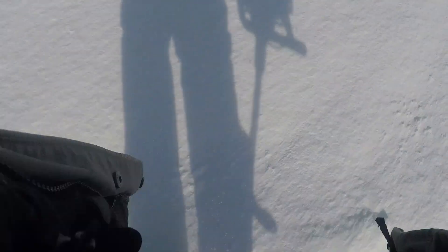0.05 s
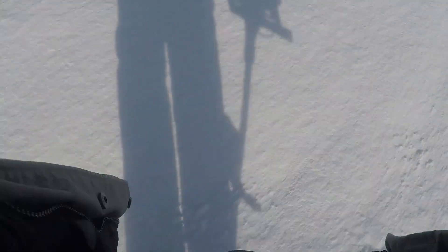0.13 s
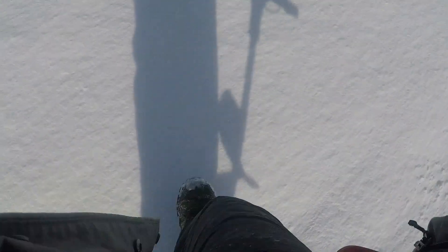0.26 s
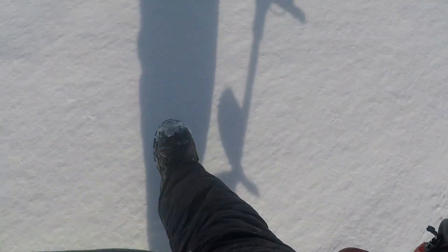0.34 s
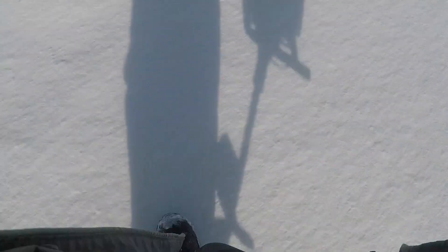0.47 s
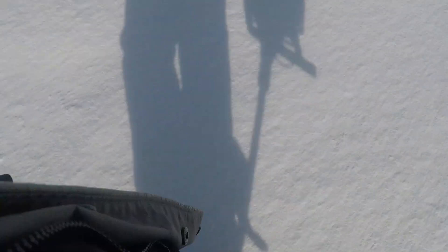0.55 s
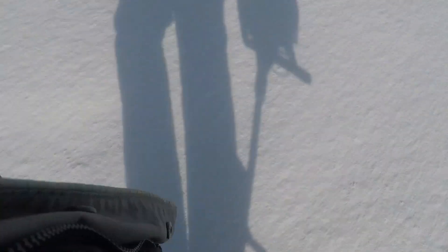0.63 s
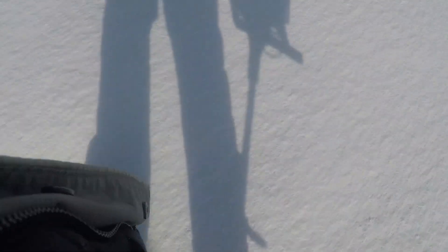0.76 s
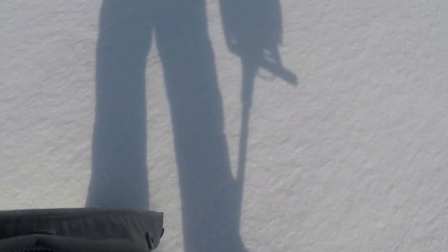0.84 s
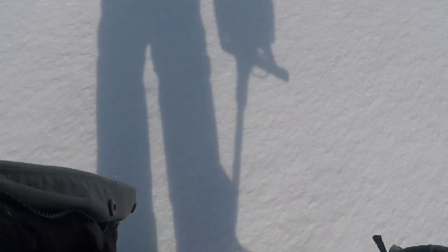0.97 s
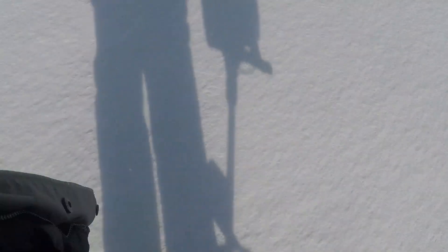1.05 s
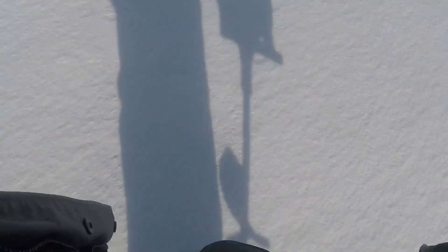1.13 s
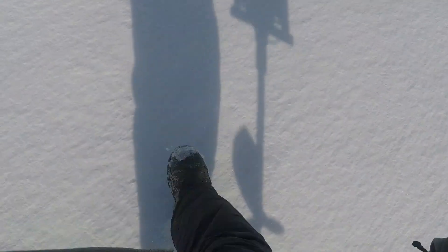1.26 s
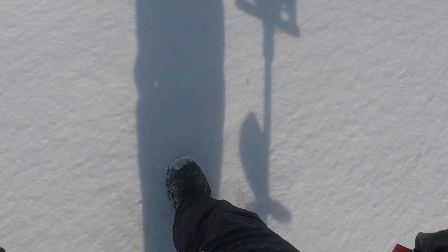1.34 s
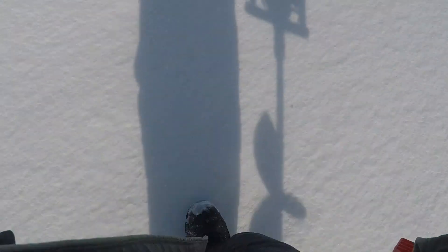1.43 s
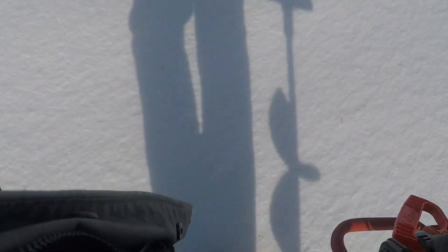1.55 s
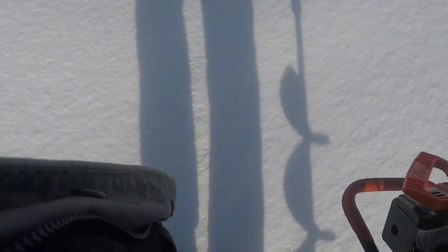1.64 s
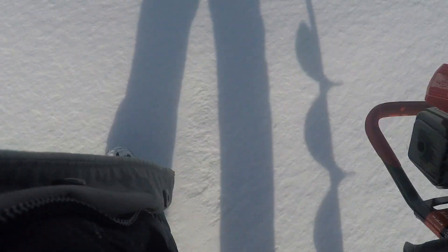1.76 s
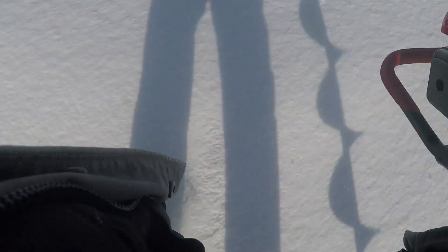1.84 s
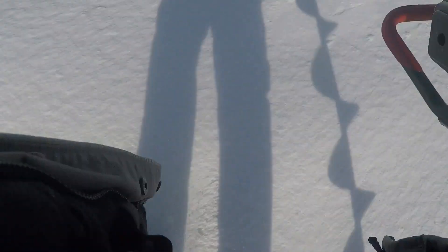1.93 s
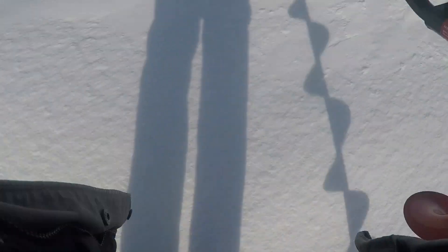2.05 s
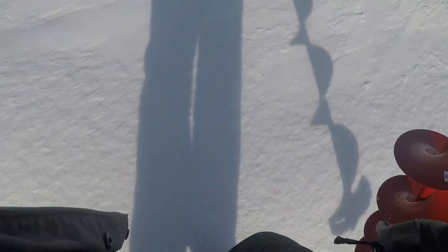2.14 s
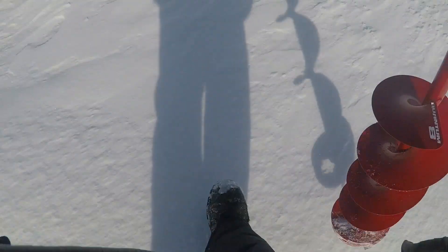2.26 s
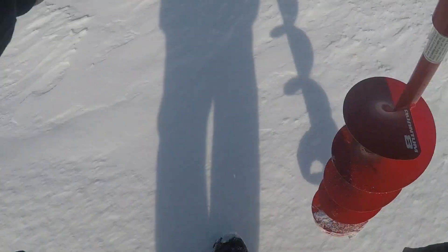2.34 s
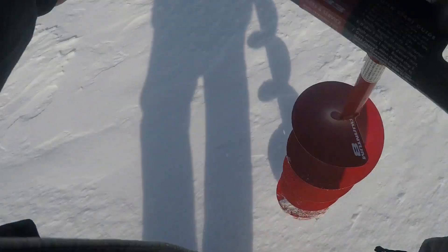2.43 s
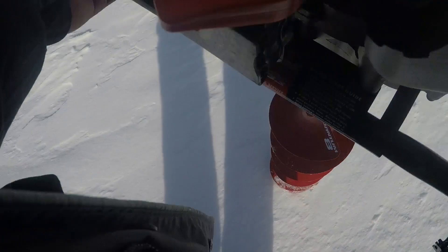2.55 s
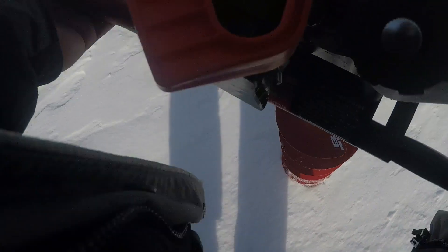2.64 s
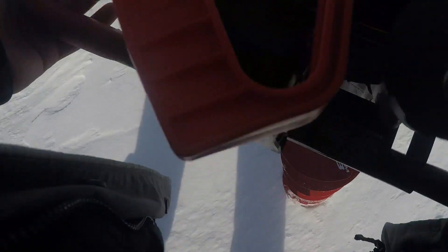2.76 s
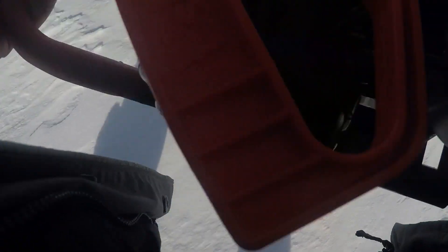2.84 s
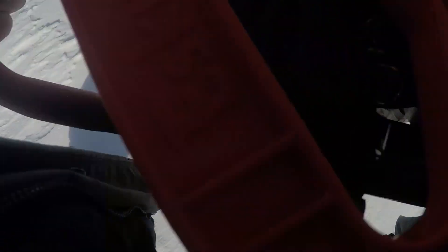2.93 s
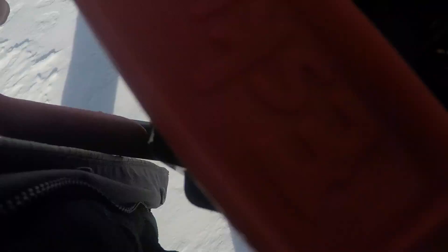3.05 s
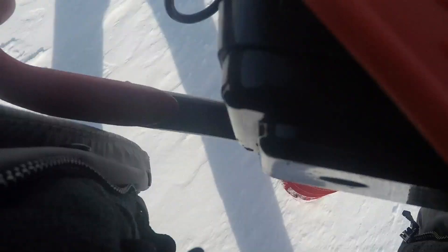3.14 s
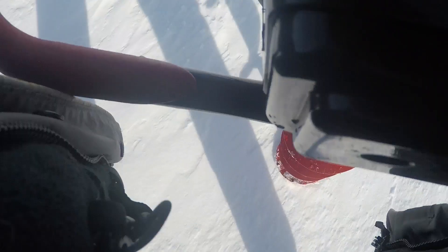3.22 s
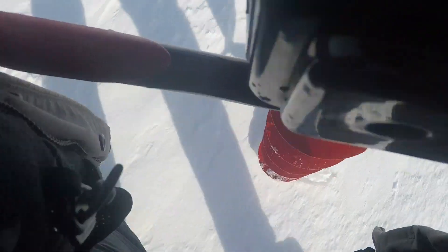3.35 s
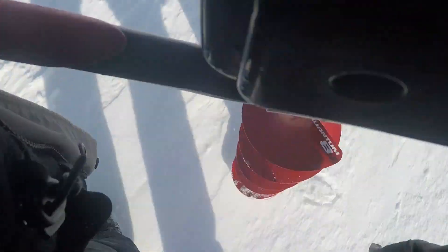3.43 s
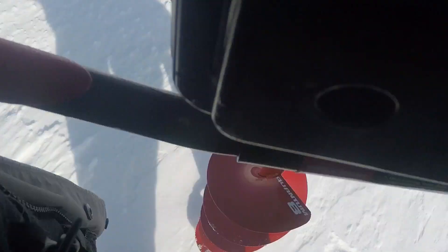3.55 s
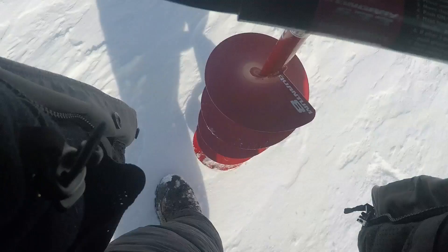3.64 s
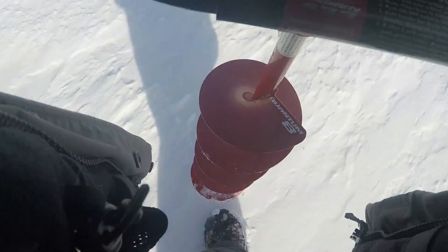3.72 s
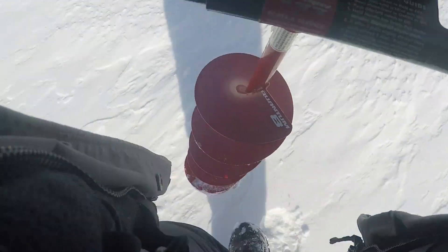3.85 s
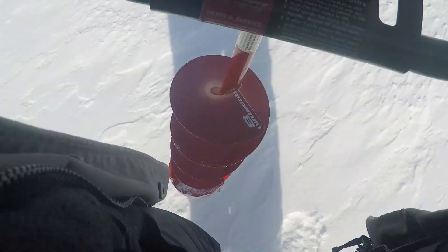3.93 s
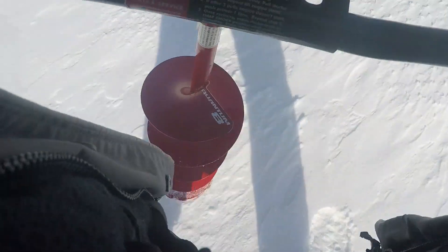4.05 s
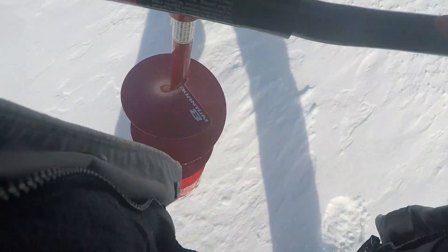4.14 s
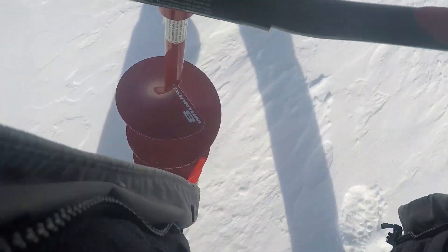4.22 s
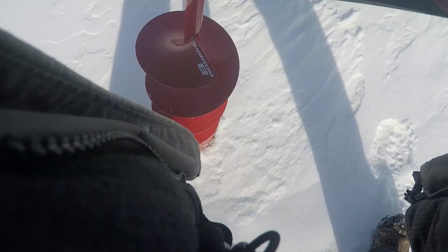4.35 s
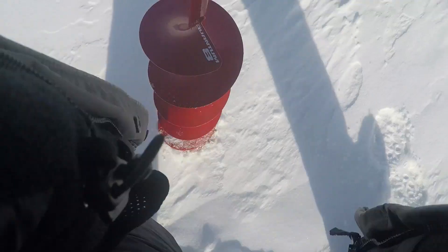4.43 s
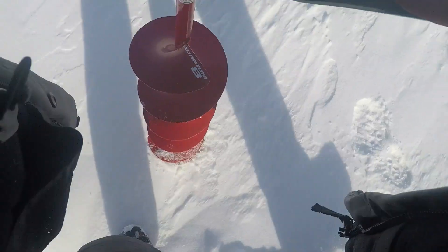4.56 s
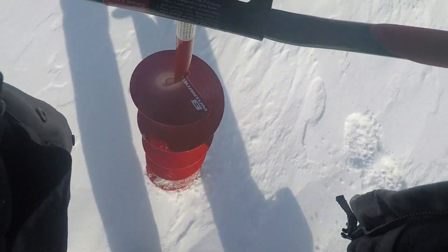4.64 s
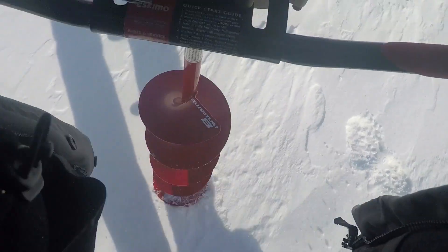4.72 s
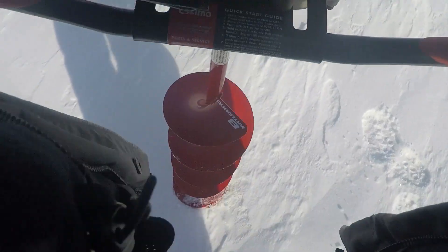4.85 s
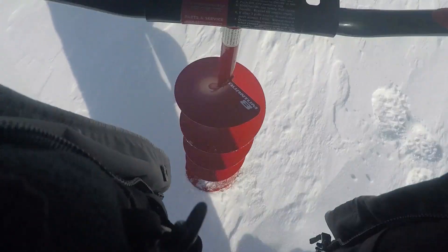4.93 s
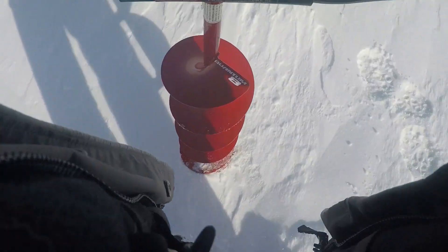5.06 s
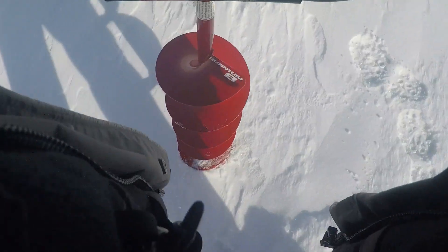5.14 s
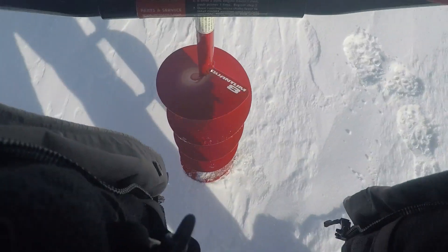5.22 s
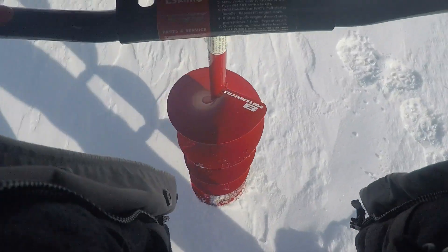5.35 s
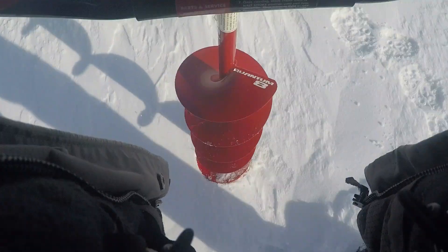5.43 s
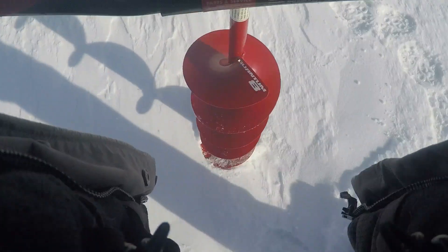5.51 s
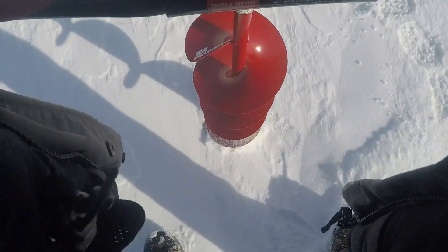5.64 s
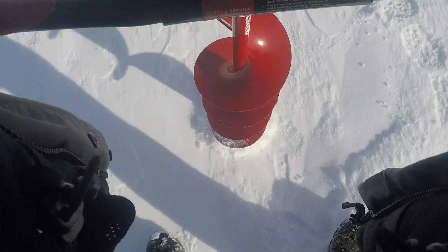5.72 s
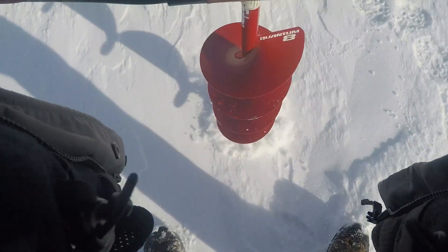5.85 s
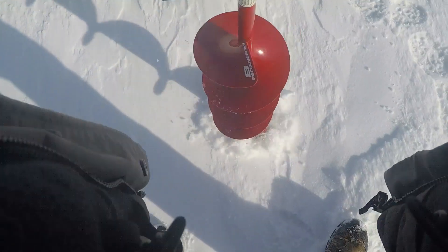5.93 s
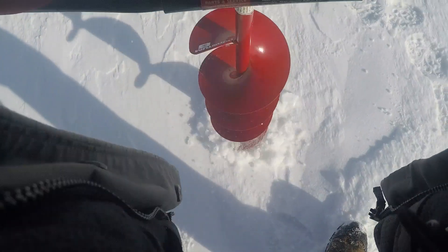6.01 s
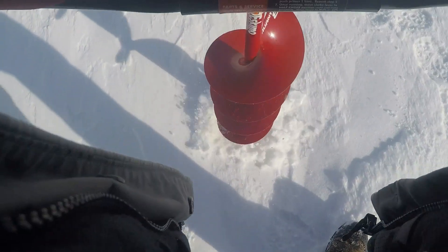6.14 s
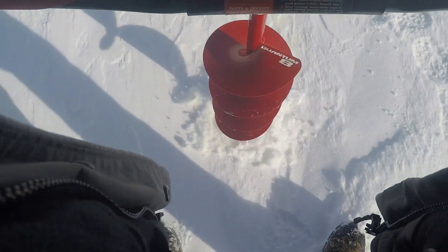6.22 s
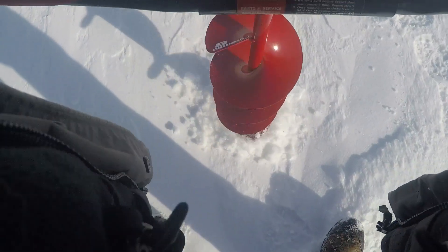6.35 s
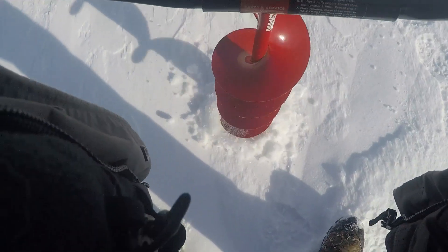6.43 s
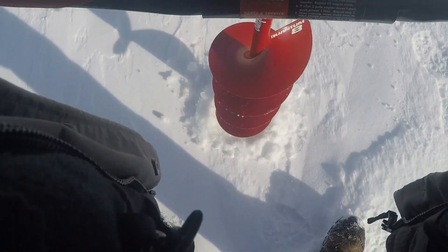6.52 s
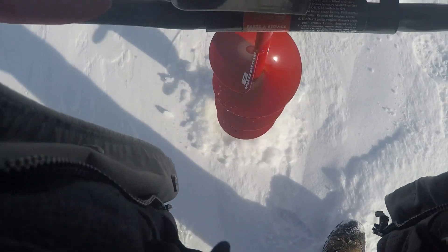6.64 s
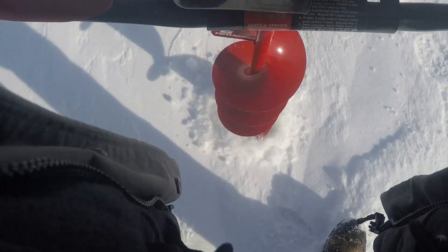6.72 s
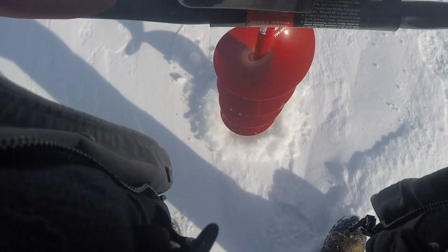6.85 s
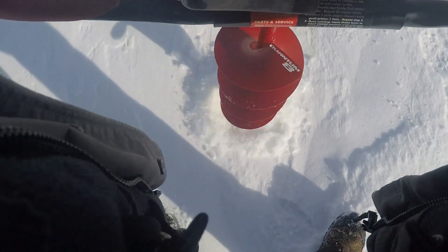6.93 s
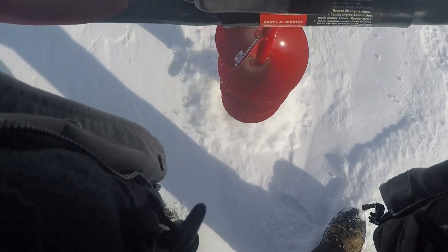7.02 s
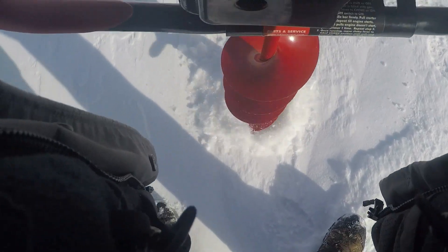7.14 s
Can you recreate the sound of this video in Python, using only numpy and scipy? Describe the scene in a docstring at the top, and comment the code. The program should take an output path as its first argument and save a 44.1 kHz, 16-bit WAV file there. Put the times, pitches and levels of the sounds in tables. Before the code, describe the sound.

A two-stroke ice auger idles outdoors, popping and clattering, while boots crunch softly on snow and wind rumbles on a body-worn microphone. The engine grows louder and more metallic as it swings close. Its housing knocks hard against the microphone and buzzes briefly, making the level dip and creep back. Near the end the throttle opens and the engine races with a gear whine, laboring slightly under load.

```python
"""Ice auger in the snow

A two-stroke ice auger idles, popping and clattering, as it is carried over crunching snow and swung
round in front of a body-worn camera. Its housing bumps the camera and buzzes against it; the gain
control ducks and creeps back. Then the throttle opens: the engine races, the gears whine and the bit
bites. Wind buffets the microphone."""
import sys
import numpy as np
from scipy import signal
from scipy.fft import rfft, irfft
from scipy.io import wavfile
from scipy.ndimage import uniform_filter1d

SR = 44100
rng = np.random.default_rng(int(sys.argv[2]) if len(sys.argv) > 2 else 0)


def materialize(psi):
    """Save the field psi as 16-bit PCM at rate SR to the path in sys.argv[1].

    A 1-D psi becomes a single channel; in a 2-D psi each row is a channel.
    """
    bounded = np.clip(np.atleast_2d(psi).T, -1, 1)
    quanta = np.round(bounded * 32767).astype(np.int16)
    wavfile.write(sys.argv[1], SR, quanta)


N = 316638
T = np.arange(N) / SR
BITE_S = 6.07  # the bit bites and the engine starts to limp


def amp(db):
    """Decibels to amplitude."""
    return 10 ** (np.asarray(db) / 20)


def unit(x):
    """Scale to an overall RMS of 1."""
    return x / np.sqrt(np.mean(x ** 2) + 1e-20)


def curve(rows):
    """Draw straight lines in time through (time, value) points."""
    return np.interp(T, *np.transpose(rows))


def steady(x):
    """Hold the running RMS at 1, leaving single beats intact."""
    return x / np.sqrt(uniform_filter1d(uniform_filter1d(x ** 2, size=4800), size=4800) + 1e-12)


def noise():
    """White noise."""
    return rng.standard_normal(N)


def waver(hz):
    """Random drift of RMS 1, mostly slower than hz."""
    return unit(irfft(rfft(noise()) / (1 + (np.fft.rfftfreq(N, 1 / SR) / hz) ** 4), N))


def colour(x, points):
    """Minimum-phase EQ through (Hz, dB) points, falling 40 dB an octave outside them."""
    hz, db = np.transpose(points)
    octave = np.log2(abs(np.fft.fftfreq(8192, 1 / SR)) + 1)
    outside = abs(octave - np.clip(octave, np.log2(hz[0]), np.log2(hz[-1])))
    gain_db = np.maximum(np.interp(octave, np.log2(hz), db) - 40 * outside, -100)
    response = np.exp(np.conj(signal.hilbert(np.log(amp(gain_db)))))
    return signal.oaconvolve(x, np.fft.ifft(response).real[:4096])[:N]


def blend(a, b, share):
    """Level two sounds and crossfade from a to b at equal power."""
    share = np.clip(share, 0, 1)
    return np.sqrt(1 - share) * steady(a) + np.sqrt(share) * steady(b)


def strokes(turns, angle, jitter, spread_db):
    """One click a turn, uneven in time and strength; angle and jitter are in turns."""
    count = np.arange(1, int(turns[-1]) + 1)
    late, size = np.clip(rng.standard_normal((len(count), 2)).T, -1.7, 1.7)
    at = np.clip(np.interp(count + angle + jitter * late, turns, np.arange(N)), 0, N - 2)
    whole, out = at.astype(int), np.zeros(N)
    out[whole] = amp(spread_db * size) * (1 - at % 1)
    out[whole + 1] += amp(spread_db * size) * (at % 1)
    return out


def fade(clicks, decay_s):
    """An envelope that jumps at each click and dies away."""
    return signal.lfilter([1], [1, -np.exp(-1 / (decay_s * SR))], clicks)


def swells(rows):
    """A bell-shaped swell for each (time [s], level [dB], half-width [s])."""
    return sum(amp(db) * np.exp(-((T - s) / width) ** 2) for s, db, width in rows)


def mode(hz, width_hz, samples):
    """The dying ring of one struck resonance."""
    t = T[:samples]
    return np.exp(-np.pi * width_hz * t) * np.cos(2 * np.pi * hz * t)


def wind():
    """Low buffeting on the microphone, dropping once the engine roars."""
    # rumble of the wind: (frequency [Hz], relative level [dB])
    rumble_eq = [(8, -2), (18, 17.5), (35, 4), (60, -5), (100, -15), (200, -14), (500, -27), (1200, -86)]
    walking_db, gust_db, revving_db = -31, 0.2, -7
    revving = np.clip((T - 5.54) / 0.22, 0, 1)
    level_db = walking_db + gust_db * waver(hz=2.4) + revving_db * revving
    return amp(level_db) * steady(colour(noise(), rumble_eq))


def jolts():
    """Steps and sways jolt the camera with soft, deep thuds."""
    # thuds: (time [s], level [dB], half-width [s])
    thuds = [(.14, -24.5, 0.032), (.49, -23, 0.084), (.85, -26.5, 0.033), (1.22, -19.5, 0.017),
             (1.59, -22.5, 0.034), (1.92, -23, 0.095), (2.63, -24, 0.042), (3.0, -35, 0.031),
             (3.17, -24, 0.018), (4.5, -20.5, 0.028), (5.81, -28, .04), (6.14, -28, .025)]
    # their tone: (frequency [Hz], relative level [dB])
    thud_eq = [(20, 4.5), (40, 2), (65, -6.5), (110, -16.5), (220, -36), (600, -70)]
    return swells(thuds) * steady(colour(noise(), thud_eq))


def snow():
    """Boots on snow and rubbing clothes crunch in clumps of tiny snaps."""
    # crunches: (time [s], level [dB], half-width [s])
    crunches = [(0.108, -45, .035), (0.252, -44, .03), (0.458, -46, .018), (.54, -48, 0.065),
                (0.828, -45.5, 0.11), (1.0, -49, .03), (1.414, -45, 0.059), (1.635, -50, .025),
                (2.548, -38, 0.051), (4.41, -28.5, .03)]
    snap_eq = [(400, 15.5), (1000, 6.5), (1400, 9.5), (3000, 7), (4800, 2), (7500, -14.5), (15000, -23)]
    snaps = noise() * (rng.random(N) < 5000 / SR)
    return swells(crunches) * unit(colour(snaps, snap_eq))


def knocks():
    """Each blow cracks on the shell, duller when soft, and rocks the camera on its mount."""
    # blows: (time [s], crack gain [dB], crack decay [s], crack cutoff [Hz],
    #         thump level [dB], thump pitch [Hz], thump decay [s])
    blows = [(2.02, -22.5, 0.0038, 2200, -42, 120, .0092), (2.675, -22, .012, 2400, -41, 100, .01),
             (3.4371, 16, 0.0087, 14000, -3, 120, .004), (3.439, 25, 0.003, 13000, 26.5, 96, 0.0041),
             (3.451, 26.5, 0.0019, 14000, 29, 108, 0.004), (3.642, 7.5, 0.0034, 2000, 26.5, 43.2, 0.01),
             (3.677, 15.5, 0.0021, 4200, 14.5, 142, 0.0096), (4.384, -13, 0.01, 12000, -37, 129, 0.0088)]
    # tone of the crack: (frequency [Hz], relative level [dB])
    crack_eq = [(150, 20), (700, -17.5), (1300, 3.5), (2000, 8), (3000, 4.5), (4500, -12), (8000, -16.5),
                (15000, -71)]
    crack, out = unit(colour(noise(), crack_eq)), np.zeros(N)
    for s, crack_db, crack_decay, cutoff_hz, thump_db, thump_hz, thump_decay in blows:
        t = np.maximum(T - s, 0)
        envelope = amp(crack_db) * np.exp(-np.minimum(t / crack_decay, 20)) * (t > 0)
        out += signal.lfilter(*signal.butter(2, cutoff_hz, fs=SR), envelope * crack)
        out += amp(thump_db) * np.sin(2 * np.pi * thump_hz * t) * np.exp(-t / thump_decay)
    return out


def housing_buzz(turns):
    """The shaking housing touches the camera and chatters on its shell once a turn."""
    # housing pressed on the camera: (time [s], gain [dB])
    contact = [(3.445, -60), (3.46, 5.5), (3.55, 0.5), (3.63, 3), (3.645, 6.5), (3.66, -55)]
    # shaking passed on: (crank order, relative level [dB])
    orders = [(1, 1), (2, 1), (3, -17), (4, -6.5), (5, -19)]
    # camera shell: (frequency [Hz], relative level [dB])
    shell_eq = [(200, 10), (500, -11), (850, -19), (1050, -12), (1330, 7.5), (1750, -2), (2050, -5),
                (2480, 4), (2880, -12), (3180, 3), (3900, -23), (4600, -7), (5700, -29), (14000, -54)]
    shake = sum(amp(db) * np.cos(2 * np.pi * (order * turns + rng.random())) for order, db in orders)
    pressure = .27 + np.cos(np.pi * (turns - .6)) ** 10
    chatter = unit(colour(noise() * pressure, shell_eq))
    touching = (T > contact[0][0]) * (T < contact[-1][0])
    return amp(curve(contact)) * (shake + amp(-5.5) * chatter) * touching


def clutch():
    """The clutch shoes scrape as they take hold, then the intake whistles briefly near 8 kHz."""
    scrape = unit(colour(noise(), [(2000, 4), (7000, 0), (15000, -17)]))
    squeal = unit(colour(noise(), [(7500, -28), (8000, 6), (8500, -14)]))
    return swells([(5.49, -22, 0.015)]) * scrape + swells([(5.56, -36, 0.051)]) * squeal


def steel(turns, near, level_db):
    """Blade and handle ring, shaken once a turn; each mode swells and sinks by itself."""
    # steel modes: (frequency [Hz], width [Hz], relative level at the hip [dB], change when near [dB])
    modes = [(2450, 23, 8, -2), (3005, 8.4, -2.5, 4), (4430, 23, -4.5, -7), (4950, 38, -5.5, 2),
             (5420, 41, -2, -1), (6090, 43, -12, 11), (6600, 84, -22, -5), (6500, 35, -13, 0)]
    flicker_db = 1.7
    kicks = strokes(turns, angle=.6, jitter=.02, spread_db=2)
    shaking = steady(noise() * (.2 + fade(kicks, decay_s=.003)))
    rings = np.zeros(N)
    for hz, width, db, near_db in modes:
        gain = amp(db + near_db * near + flicker_db * waver(hz=0.67))
        rings += gain * signal.oaconvolve(shaking, mode(hz, width, 4096))[:N]
    return amp(level_db) * unit(rings)


def gears(hz, turns):
    """Meshing teeth and fan blades sing on whole crank orders, loudest where the gearbox resonates."""
    # partials of the whine: (crank order, relative level [dB])
    partials = [(13, -15), (14, -15.5), (15, -17), (16, -7.5), (18, -2), (19, -14.5), (20, 1.5), (21, -12),
                (22, 2.5), (23, -3), (28, -16), (29, -13)]
    # gearbox resonances: (frequency [Hz], gain [dB])
    gearbox = [(1700, -18), (2000, -18.5), (2250, -31), (2410, -24), (2490, -16), (2600, -17),
               (2690, -21.5), (2790, -23), (3000, -32), (3900, -40)]
    angle = 2 * np.pi * (turns + 0.0014 * waver(hz=45))
    whine = np.zeros(N)
    for order, db in partials:
        resonance_db = np.interp(order * hz, *np.transpose(gearbox))
        gain = amp(db + resonance_db + 0.52 * waver(hz=22))
        whine += gain * np.cos(order * angle + 2 * np.pi * rng.random())
    return np.sqrt(2) * whine


def fan_hiss(beat, throttle, close):
    """Fan air hisses, pulsing with the beat of the clatter."""
    # air from behind the body: (frequency [Hz], relative level [dB])
    behind_eq = [(2530, -22), (4300, 10.5), (4730, 1.5), (4910, 2), (5580, 6), (5790, -15), (6970, -28),
                 (7310, -10), (8130, -9), (8530, -31), (11400, -15), (13300, -30), (15300, -55)]
    # air close up: (frequency [Hz], relative level [dB])
    close_eq = [(2530, -4), (4300, 2), (4530, 0), (4940, 0), (6720, 3.5), (7310, -1), (7630, -9),
                (8180, -5.5), (9440, -13.5), (10800, -14), (11900, -10), (14700, -27.5), (15300, -25)]
    air = noise() * (beat + 1.4 + 0.16 * throttle + 1.5 * (1 - close))
    return blend(colour(air, behind_eq), colour(air, close_eq), close)


def clatter(turns, throttle, close, level_db, hiss_db):
    """The piston slaps and the clutch rattles each turn, ringing casing and fins; the fan hisses along."""
    # casing from behind the body: (frequency [Hz], relative level [dB])
    behind_eq = [(590, -21), (1000, -15), (1140, -26), (1320, -15.5), (1960, -18), (2480, 0.5),
                 (2740, -20.5), (3080, -8), (3520, -30), (3850, -8), (4600, -45), (5980, -25),
                 (10100, -120)]
    # casing close up: (frequency [Hz], relative level [dB])
    close_eq = [(620, -27), (1050, -25.5), (1280, -25), (1480, -15), (1600, -20.5), (1730, -9.5),
                (1900, -12), (2050, -1.5), (2360, -11), (2860, 2), (3440, -12.5), (3920, -2), (4600, -34.5),
                (5980, -101), (10100, -120)]
    # casing at full throttle: (frequency [Hz], relative level [dB])
    racing_eq = [(650, -26.5), (1100, -20.5), (1270, -24.5), (1370, -12.5), (1540, -14.5), (1740, -4.5),
                 (2240, -6.5), (2480, 0.5), (3040, -3.5), (3310, -10.5), (3910, -2.5), (4600, -49),
                 (5980, -21), (10100, -120)]
    # modes of the cooling fins and covers: (frequency [Hz], width [Hz], relative level [dB])
    fins = [(1710, 16, 3), (2270, 90, -20), (2500, 31, 10.5), (2680, 115, 27.5), (2928, 56, 26),
            (3640, 160, -61), (3940, 130, -11), (5550, 58, 10), (6550, 250, -52)]
    slap = strokes(turns, angle=.52, jitter=.008, spread_db=2.2)
    rattle = strokes(turns, angle=.7, jitter=.018, spread_db=2)
    rebound = strokes(turns, angle=.1, jitter=.03, spread_db=2)
    contrast = 1 - 0.16 * throttle  # at speed the blows grow alike
    blows = 1.2 * slap ** contrast + rattle ** contrast + (0.44 + 2 * throttle) * rebound ** contrast
    beat = steady(fade(blows, decay_s=.0036))
    grit = noise() * (beat + .2 + .9 * throttle + .9 * (1 - close))
    idling = blend(colour(grit, behind_eq), colour(grit, close_eq), close)
    casing = blend(idling, colour(grit, racing_eq), throttle)
    ring = sum(amp(db) * mode(hz, width, 2048) for hz, width, db in fins)
    ringing = colour(signal.oaconvolve(blows, ring)[:N], [(1750, 0.0067), (6800, 0)])
    metal = blend(casing, ringing, .36 - .14 * throttle)
    return amp(level_db) * metal + amp(hiss_db) * fan_hiss(beat, throttle, close)


def gas_puffs(firings, throttle):
    """Gas rushes under the pops and splutters while the throttle snaps open."""
    idle_db, open_db, splutter_db = -9, -14.5, 18
    gas_eq = [(120, -4), (240, 1.5), (330, -3), (550, -3.5), (900, -17), (1500, -28)]
    gas = steady(colour(noise() * (.5 + fade(firings, decay_s=0.13)), gas_eq))
    return amp(idle_db + open_db * throttle + splutter_db * np.sin(np.pi * throttle)) * gas


def exhaust(hz, turns, throttle, level_db):
    """One pop a turn through the muffler, barking as it revs; at top speed every other firing weakens."""
    # muffler at idle: (frequency [Hz], relative level [dB])
    idle_eq = [(30, -70), (55, 3.5), (110, -3), (170, -1), (225, 3.5), (275, 7), (335, -4), (385, -8),
               (445, 0.5), (500, -7.5), (620, -9.5), (800, -13.5), (900, -26.5), (1100, -14.5), (1400, -36),
               (2000, -24)]
    # muffler pulling up to speed: (frequency [Hz], relative level [dB])
    pulling_eq = [(40, -11), (85, 8.5), (125, 12), (200, -3.5), (260, 5.5), (350, -2.5), (450, -5),
                  (600, -7), (680, -9), (760, -1), (930, -17.5), (1010, -8), (1250, -25), (1450, -6),
                  (2000, -23)]
    # muffler flat out: (frequency [Hz], relative level [dB])
    open_eq = [(40, 4), (85, -8), (125, 19.5), (200, -1.5), (272, 9.5), (350, -4), (430, -6.5), (550, -14),
               (690, 5), (830, -6.5), (1000, -7), (1100, -20), (2000, -32)]
    limp_depth, limp_db = 0.4, -2.5
    resonance_hz, width_hz, resonance_db = 118.5, 11.8, 5
    idle = strokes(turns, angle=-.03, jitter=.003, spread_db=1.4)
    racing = strokes(turns, angle=-.03, jitter=.004, spread_db=.5)
    limping = np.clip((T - BITE_S) / 0.033, 0, 1)
    limp = limp_depth * limping * np.cos(np.pi * turns)
    # the limp is felt in the low notes
    racing = racing + colour(racing * limp, [(40, 5.5), (350, 10), (480, 10.5), (600, 1.0), (2000, -8)])
    up_to_speed = np.clip((hz - 123) / 14, 0, 1)
    roar = blend(colour(racing, pulling_eq), colour(racing, open_eq), up_to_speed)
    pops = blend(colour(idle, idle_eq), roar, throttle)
    # the muffler booms as the firing rate sweeps through its resonance
    boom_db = resonance_db * np.exp(-((hz - resonance_hz) / width_hz) ** 2)
    return amp(level_db + boom_db + limp_db * limping) * (pops + gas_puffs(idle, throttle))


def crank():
    """Speed and turns of the crankshaft, and the throttle opening 0-1 that goes with them."""
    # idling: (time [s], speed [turns/s])
    idle_speed = [(0.0, 57.4), (0.59, 56.0), (1.55, 57.4), (2.01, 55.1), (4.15, 56.3), (4.47, 54.4),
                  (5.3, 54.6)]
    # revving up: (time [s], speed [turns/s])
    rev_speed = [(5.37, 54.6), (5.41, 59.9), (5.464, 77.4), (5.516, 87.2), (5.576, 90.4), (5.702, 112.2),
                 (5.802, 123.2), (5.994, 136.3), (6.196, 139.9), (6.392, 136.3), (6.538, 138.0),
                 (6.786, 133.8), (6.942, 135.1), (7.18, 132.4)]
    hz = curve(list(idle_speed) + list(rev_speed))
    throttle = np.clip((hz - 57) / 32, 0, 1)
    wander_turns = 0.0235 * (1 - throttle) * waver(hz=4.9)
    turns = np.maximum.accumulate(np.cumsum(hz) / SR + wander_turns)
    return hz, turns, throttle


def engine(hz, turns, throttle):
    """The two-stroke's voices, louder when near, with the throttle open and under load."""
    # the swing from the hip to the front of the camera: (time [s], nearness [0-1])
    swing = [(0, 0.07), (1.25, 0), (1.93, 0.3), (2.1, 0.48), (2.33, 0.67), (2.5, 0.85), (3.1, 0.92),
             (4.1, .99), (5.3, 0.84)]
    # faders of the voices: (idling at the hip [dB], added when near [dB], added at full throttle [dB])
    exhaust_mix = (-42, 11.5, 7.5)
    clatter_mix = (-44.5, 21, 12)
    hiss_mix = (-56.5, 14.5, 14.5)
    steel_mix = (-49.5, 18, 4)
    free_hz, load_db_per_hz = 138.3, 0.3
    whine_from_hz, whine_span_hz, clatter_duck_db = 105.3, 28.6, -6
    near = curve(swing)
    close = np.clip((near - .27) / 0.6, 0, 1)  # the body stops shading the engine
    sag_hz = np.maximum(free_hz - hz, 0) * np.clip((T - BITE_S) / .2, 0, 1)  # the bit drags on the crank
    exhaust_db, clatter_db, hiss_db, steel_db = (
        idle_db + near_db * near + throttle_db * throttle + load_db_per_hz * sag_hz
        for idle_db, near_db, throttle_db in (exhaust_mix, clatter_mix, hiss_mix, steel_mix))
    whining = np.clip((hz - whine_from_hz) / whine_span_hz, 0, 1)
    return (exhaust(hz, turns, throttle, exhaust_db)
            + steel(turns, near, steel_db)
            + whining * gears(hz, turns)
            + clatter(turns, throttle, close, clatter_db + clatter_duck_db * whining, hiss_db))


def scene():
    """One crankshaft drives engine and buzz; clutch, knocks, snow, wind and jolts join them in mono."""
    hz, turns, throttle = crank()
    auger = engine(hz, turns, throttle) + housing_buzz(turns) + clutch()
    return (auger + knocks() + snow() + wind() + jolts())[None]


def record(dry):
    """Gain control ducks just ahead of an overload and creeps back; peaks saturate; the top is cut."""
    ceiling_db, deepest_db, recovery_db_per_s, look_ahead_s = -4, 22.5, 14.8, .016
    top_hz = 15450
    power_db = 10 * np.log10(signal.lfilter(np.ones(150) / 150, [1], dry[0] ** 2) + 1e-12)
    wanted_db = np.minimum(power_db - ceiling_db, deepest_db)
    recovery_db = recovery_db_per_s * T
    cut_db = np.maximum(np.maximum.accumulate(wanted_db + recovery_db) - recovery_db, 0)
    cut_db = np.maximum(cut_db, np.interp(T + look_ahead_s, T, cut_db))
    smooth_cut = fade(1 - amp(-cut_db), decay_s=.0006) / fade(np.ones(N), decay_s=.0006)
    ducked = dry * (1 - smooth_cut)
    saturated = .95 * ducked / (1 + ducked ** 6) ** (1 / 6)
    lowpass = signal.firwin(511, top_hz, window=("kaiser", 9), fs=SR)
    return signal.oaconvolve(saturated, lowpass[None], "same")


dry = scene()
out = record(dry)
materialize(out)
```